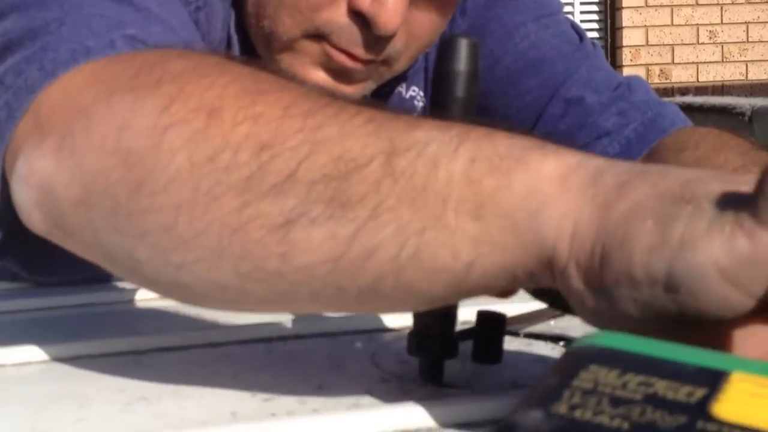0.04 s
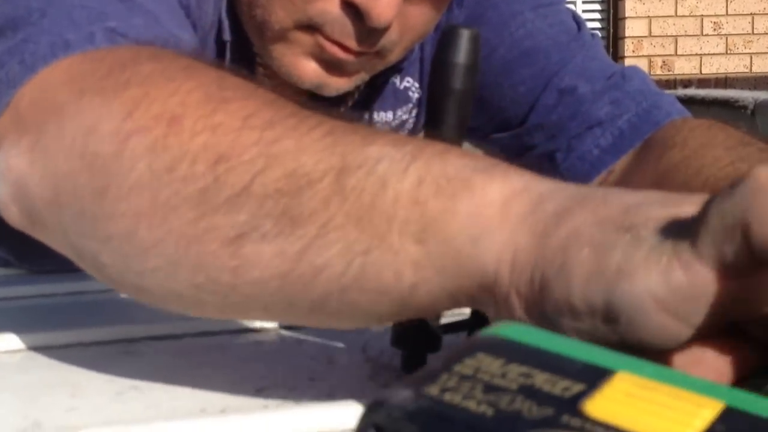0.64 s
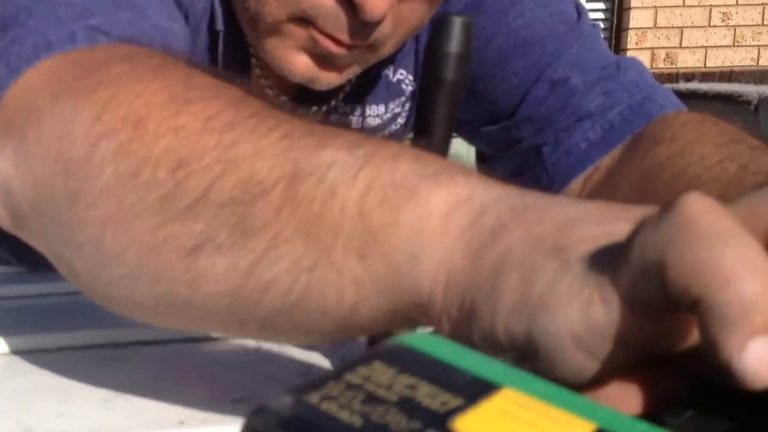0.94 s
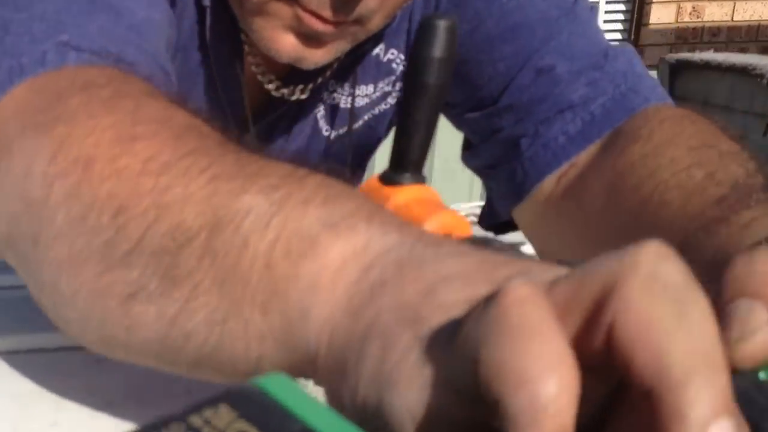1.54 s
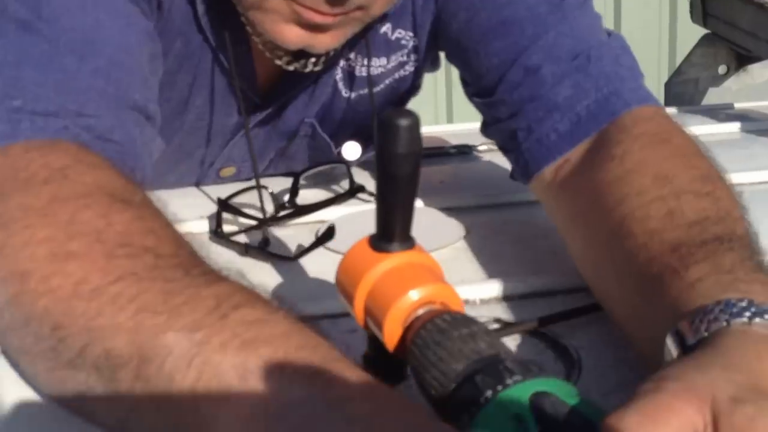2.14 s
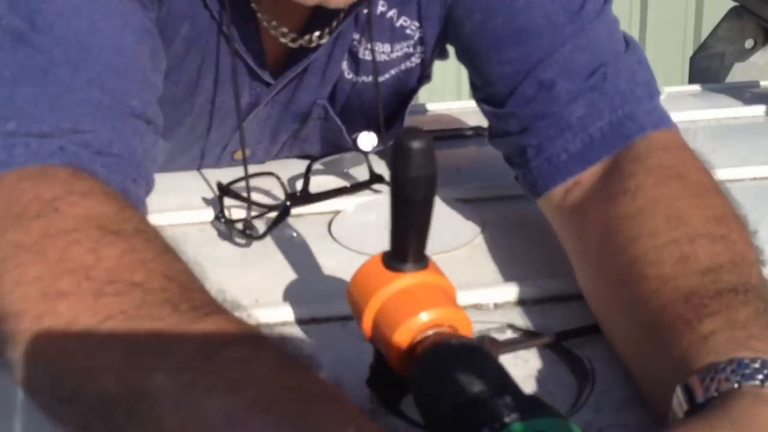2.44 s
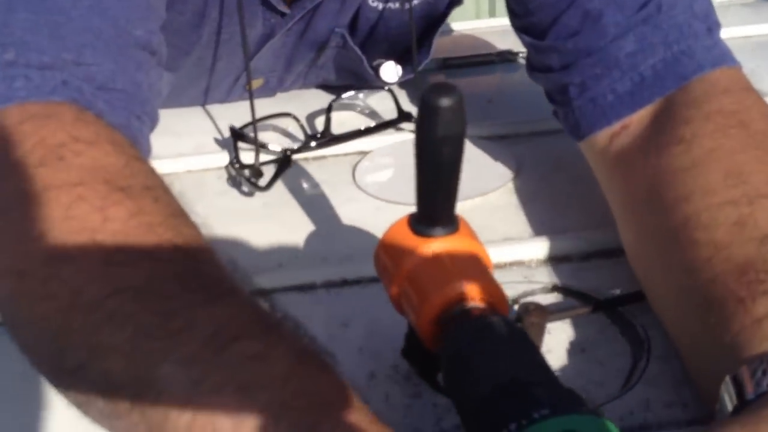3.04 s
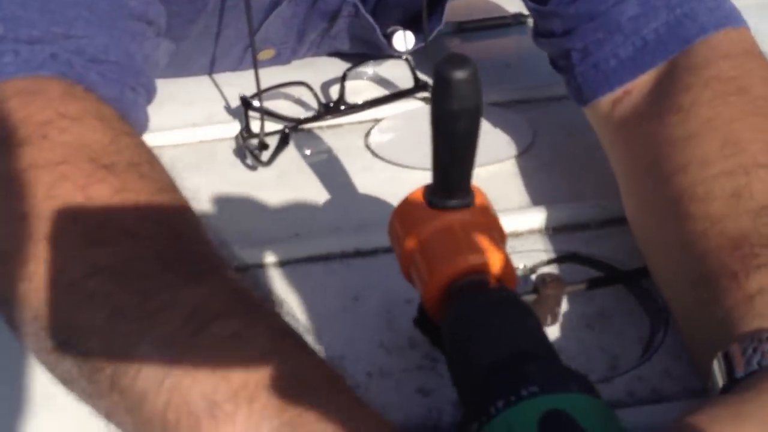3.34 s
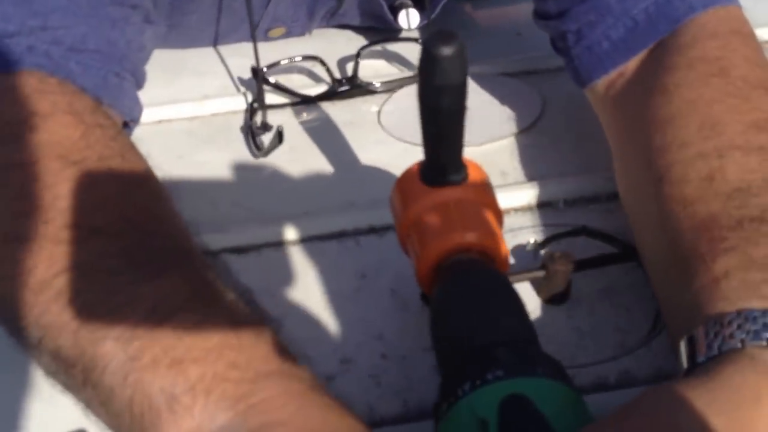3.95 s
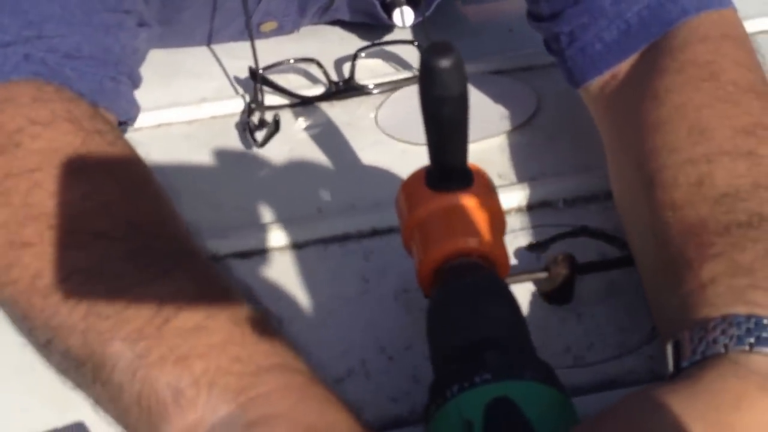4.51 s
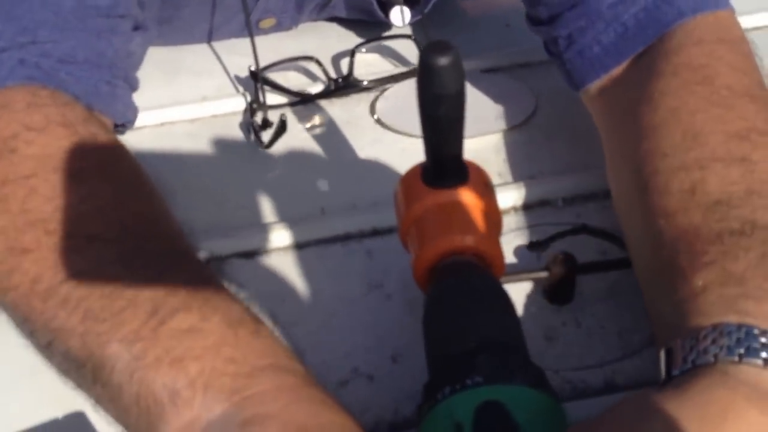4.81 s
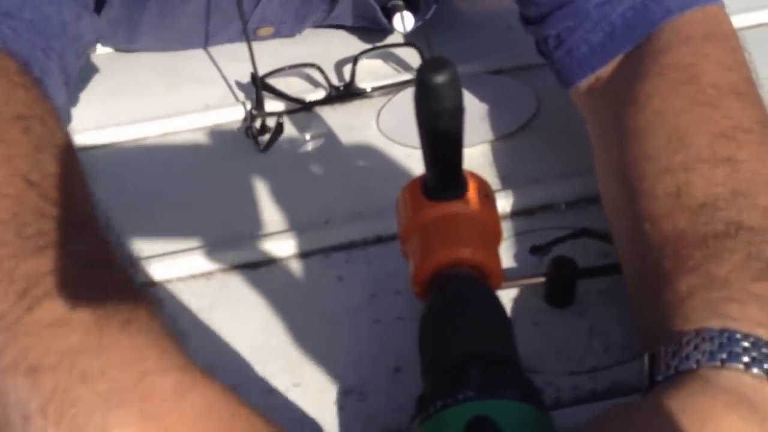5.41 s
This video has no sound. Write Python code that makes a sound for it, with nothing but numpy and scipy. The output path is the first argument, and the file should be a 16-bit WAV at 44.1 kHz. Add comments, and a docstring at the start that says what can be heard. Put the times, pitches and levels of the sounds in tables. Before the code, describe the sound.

A drill-driven nibbler cuts through a sheet-metal roof outdoors, heard close up. Its punch hammers very fast, each bite a sharp crack with a short metallic ring and a low panel thud, over a gritty, raspy gear whine. The drill slows briefly midway, picks up again, and runs down near the end. The motor then starts a quiet hum.

```python
"""A fast metallic hammering over a raspy whine: a drill-driven nibbler cuts a sheet-metal roof outdoors.
About 15 times a second the punch cracks through the sheet and rings it; at each bite the gear whine
peaks and sags in pitch. Crank speed and feed pressure drive both. An arm screens the tool at first.
The drill slows once midway, runs down near the end and starts to hum again."""
import sys
import numpy as np
from scipy import signal
from scipy.fft import rfft, irfft, next_fast_len
from scipy.io import wavfile
from scipy.ndimage import map_coordinates

SR = 44100
rng = np.random.default_rng(int(sys.argv[2]) if len(sys.argv) > 2 else 0)


def wrap_up_sound(samples):
    """Save the sound to the file named by the first command line argument, as 16-bit audio."""
    columns = np.atleast_2d(samples).T
    # keep every value between -1 and 1, then stretch to whole-number steps
    tamed = np.clip(columns, -1, 1)
    steps = np.round(tamed * 32767).astype(np.int16)
    wavfile.write(sys.argv[1], SR, steps)


N = 245637
TIME = np.arange(N) / SR
TOP_HZ = 15450
RING_DB = -15  # base level of the sheet's modes and clatter

# Pressure pushing the tool into the cut. Each row: time in seconds, level in dB.
FEED_PRESSURE = [(0, -1.5), (.5, -0.5), (.65, -1.5), (.88, 1.7), (1.02, -0.5), (1.2, 2.5), (1.42, 0.5),
                 (1.52, -2.5), (1.66, 1.5), (2.02, -0.5), (2.2, 1.5), (2.35, -0.5), (3.05, 1.6), (3.57, -1),
                 (4.22, -0.2), (4.48, -0.6), (4.8, 1.26), (5.26, 1)]
# Spectrum of shearing metal. Each row: frequency in Hz, level in dB.
CRACK_SPECTRUM = [(60, -32), (250, -9.5), (1000, -2), (2500, 4), (3500, 1), (5500, 1), (8000, 3.5),
                  (10300, -2), (12500, 2.5), (15000, -0.5)]


def amp(db):
    """Decibels to gain."""
    return 10 ** (np.asarray(db) / 20)


def unit(x):
    """Scale to rms 1."""
    return x / np.sqrt(np.mean(x ** 2) + 1e-20)


def curves(rows, at=TIME):
    """Interpolate each later column linearly over the first."""
    knots, *columns = np.transpose(rows)
    return [np.interp(at, knots, column) for column in columns]


def wobble(knots_per_s):
    """Smooth random curve."""
    return map_coordinates(rng.standard_normal(int(N * knots_per_s / SR) + 4), [TIME * knots_per_s])


def coloured(x, spectrum, modes=()):
    """Minimum-phase filter of unit power: a broad spectrum lifted by resonances."""
    size = 2 ** 13
    hz = np.fft.rfftfreq(size, 1 / SR)
    knots_hz, knots_db = np.transpose(spectrum)
    lift_db = sum(db / (1 + (2 * (hz - mode_hz) / width_hz) ** 2) for mode_hz, width_hz, db in modes)
    gain = amp(np.interp(np.log(hz + 1), np.log(knots_hz), knots_db) + lift_db)
    gain /= np.sqrt(np.mean(gain[hz < TOP_HZ] ** 2) * TOP_HZ * 2 / SR)
    cepstrum = irfft(np.log(gain))
    cepstrum[1:size // 2] *= 2
    cepstrum[size // 2 + 1:] = 0
    return signal.fftconvolve(x, irfft(np.exp(rfft(cepstrum))))[:N]


def burst(delay_s, attack_s, t60_s):
    """Envelope: quick rise, exponential fall."""
    t = np.maximum(np.arange(SR // 4) / SR - delay_s, 0)
    return (1 - np.exp(-t / attack_s)) * amp(-60 * t / t60_s)


def blows(times_s, levels_db, envelope, alike, pattern_count=8):
    """Dense ringing per punch; the share `alike` recurs, its colour slowly changing over time."""
    ring_patterns = rng.standard_normal((pattern_count, len(envelope)))
    out = np.zeros(N + SR)
    for start_s, db in zip(times_s, levels_db):
        centre = start_s * SR / N * (pattern_count - 1)
        weights = np.exp(-(np.arange(pattern_count) - centre) ** 2)
        recurring = weights @ ring_patterns / np.linalg.norm(weights)
        ring = np.sqrt(alike) * recurring + np.sqrt(1 - alike) * rng.standard_normal(len(envelope))
        out[round(start_s * SR):][:len(envelope)] += amp(db) * envelope * ring
    return out[:N]


def screened(at=TIME, half_clear_s=1.76, move_s=1):
    """1 while the arm hides the tool, 0 once it is in the open."""
    return np.clip(.5 - (at - half_clear_s) / move_s, 0, 1)


def crank(first_punch_s=0.0094, nominal_turns_per_s=15):
    """Turns since the first punch, and speed in decades relative to nominal."""
    # Crank speed. Each row: time in seconds, turns per second.
    crank_speed = [(0.0, 14.745), (0.842, 14.871), (0.963, 14.328), (1.167, 14.925), (1.458, 14.993),
                   (1.637, 14.615), (1.863, 14.924), (2.568, 15.037), (2.652, 9.003), (2.806, 8.225),
                   (2.881, 14.291), (3.069, 15.239), (3.803, 15.202), (4.429, 15.619), (4.793, 15.326),
                   (5.113, 15.689), (5.172, 11.365), (5.45, 1.0)]
    turns_per_s, = curves(crank_speed)
    turns = np.cumsum(turns_per_s) / SR
    return turns - np.interp(first_punch_s, TIME, turns), np.log10(turns_per_s / nominal_turns_per_s)


def strokes(db_per_decade=5, scatter_db=0.92):
    """Time and force of the punches: one per turn, harder with more feed and speed."""
    turns, decades = crank()
    times_s = np.interp(np.arange(np.ceil(turns[-1])), turns, TIME)
    feed_db, = curves(FEED_PRESSURE, times_s)
    speed_db = db_per_decade * np.interp(times_s, TIME, decades)
    return times_s, feed_db + speed_db + scatter_db * rng.standard_normal(len(times_s))


def air(level_db=-72):
    """Faint, dull outdoor noise."""
    return amp(level_db) * coloured(rng.standard_normal(N), [(130, 4), (12000, -48)])


def motor_restart(start_s=5.455, rise_s=0.024, base_db=-40, inrush_db=8.5, inrush_s=0.038,
                  mains_hz=50, drone_hz=183):
    """The slow motor surges and drones; its brushes rasp with each half cycle of the mains."""
    # Brush noise spectrum. Each row: frequency in Hz, level in dB.
    brush_spectrum = [(30, -31), (150, 7.5), (500, -12), (3500, -6.5), (7000, -19.5), (15000, -22)]
    # Drill resonances. Each row: centre in Hz, width in Hz, lift in dB.
    drill_modes = [(295, 160, 14.5), (1124, 250, 12), (2700, 560, 11), (5100, 450, 11), (8380, 300, 21)]
    age_s = np.maximum(TIME - start_s, 0)
    envelope = np.minimum(age_s / rise_s, 1) * amp(base_db + inrush_db * np.exp(-age_s / inrush_s))
    torque = 1 + 0.28 * np.cos(2 * np.pi * 2 * mains_hz * TIME)
    drone = amp(-1) * np.sin(2 * np.pi * np.cumsum(drone_hz * (1 + 0.075 * wobble(60))) / SR)
    brushes = unit(coloured(torque * rng.standard_normal(N), brush_spectrum, drill_modes))
    return envelope * (drone + brushes)


def die_scrape():
    """The die catches and slides on the sheet along the first stretch of the cut."""
    # Scrape envelope. Each row: time in seconds, level in dB.
    scrape_levels = [(.9, -29), (1.2, -25), (1.45, -24.5), (2.1, -73)]
    # Friction spectrum. Each row: frequency in Hz, level in dB.
    scrape_spectrum = [(100, -19), (400, -18), (2200, -1), (3600, -17), (5000, -15.5), (6300, -13),
                       (7800, -17), (10000, -43)]
    level_db, = curves(scrape_levels)
    slips = unit(rng.standard_normal(N) * amp(3.7 * wobble(250) + 0.75 * wobble(27.74)))
    return amp(level_db) * coloured(slips, scrape_spectrum)


def gear_noise(base_db=-23, db_per_decade=25.5, arm_db=-2.4, repeat_share=0.46, points_per_turn=2900):
    """Gritty churn that grows with speed and feed, plus a bright crunch as the punch starts to shear."""
    # Noise through one stroke. Each row: turn since the punch (0-1), churn in dB, crunch in dB.
    stroke_levels = [(0, 1, -10), (.3, -1.2, -40), (.7, -2.5, -17), (.9, -0.5, -11), (1, 4, -5)]
    # Gear noise spectrum. Each row: frequency in Hz, level in dB.
    gear_spectrum = [(25, -29), (55, -24.5), (110, -5.5), (160, 5), (205, 4), (275, 2), (460, -4.5),
                     (600, -2), (2600, -10.5), (3600, -10), (5000, -12), (8200, -18.5), (10000, -25),
                     (15000, -32)]
    turns, decades = crank()
    turn = turns % 1
    feed_db, = curves(FEED_PRESSURE)
    level_db = base_db + db_per_decade * decades + feed_db + arm_db * screened()
    churn_db, crunch_db = curves(stroke_levels, turn)
    gear_grit, shear_grit = unit(rng.standard_normal((2, N)) * amp(2.6 * wobble(600)))
    # the same teeth meet on every turn, so part of the noise repeats
    flanks = irfft(np.exp(2j * np.pi * rng.random(points_per_turn // 2 + 1)))
    teeth = unit(map_coordinates(flanks, [turn * points_per_turn], mode="grid-wrap"))
    churn = np.sqrt(repeat_share) * teeth + np.sqrt(1 - repeat_share) * gear_grit
    crunch = coloured(shear_grit * amp(level_db + crunch_db), CRACK_SPECTRUM)
    return coloured(churn * amp(level_db + churn_db - 2), gear_spectrum) + crunch


def gear_whine(mesh_hz=2870, base_db=-30.5, db_per_decade=70, arm_db=-3.5, flutter=0.01395, rasp=0.38):
    """The mesh tone follows speed, swells and sags at each bite; backlash frays it into a rasp."""
    # Gear load through one stroke. Each row: turn since the punch (0-1), pitch ratio, level in dB.
    gear_load = [(0, .96, -15), (.06, .93, 1), (.3, .98, 1.5), (.5, 1.0, 4.5), (.72, 1.005, -7.5),
                 (.88, 1.04, 3), (.96, 1.015, 13.5), (1, .96, 14)]
    turns, decades = crank()
    feed_db, = curves(FEED_PRESSURE)
    level_db = base_db + db_per_decade * decades + feed_db + arm_db * screened()
    sag, load_db = curves(gear_load, turns % 1)
    pitch_hz = mesh_hz * 10 ** decades * sag * (1 + flutter * wobble(500))
    phase = 2 * np.pi * np.cumsum(pitch_hz) / SR
    tone = np.sin(phase) + rasp * wobble(700) * np.cos(phase)
    roughness_db = 2.6 * wobble(250) + 1.5 * wobble(25.02)
    return tone * amp(level_db + load_db + roughness_db)


def panel_thuds(times_s, forces_db, base_db=2, scatter_db=2, jitter_s=0.00031):
    """Each stroke shoves the panel, which slaps back against the die and flexes with a low thud."""
    # Pushes in one stroke. Each row: delay after the punch in seconds, level in dB.
    pushes = [(.0008, -2.5), (0.0134, -5), (0.0233, -4.5), (0.0435, -8.5)]
    # Flexing panel's response. Each row: frequency in Hz, level in dB.
    flex_spectrum = [(30, -41), (70, -26), (110, -10.5), (160, 1.5), (210, -4.5), (272, 2), (430, -14),
                     (1000, -35.5), (4000, -57)]
    delay_s, push_db = np.transpose(pushes)
    chance = rng.standard_normal((len(times_s), 2, len(delay_s)))
    onsets = np.round((times_s[:, None] + delay_s + jitter_s * chance[:, 0]) * SR).astype(int)
    gains = amp(base_db + forces_db[:, None] + push_db + scatter_db * chance[:, 1])
    impulses = np.bincount(np.clip(onsets.ravel(), 0, N), gains.ravel(), N)
    return coloured(impulses, flex_spectrum)


def sheet_ring(times_s, forces_db, scatter_db=2, detune=0.0091, attack_s=0.0012):
    """Each punch rings the modes; their balance shifts as the arm moves away."""
    # Sheet and tool modes. Each row: frequency in Hz, t60 in seconds, screened dB, open dB.
    sheet_modes = [(275.7, 0.1, -10, -10.5), (341.2, 0.087, -18, -7), (564, 0.13, -7, -9),
                   (637, 0.062, -3, -4.5), (905, 0.039, 1, -7), (1162, 0.081, -10, -1.5),
                   (1247, 0.056, -7.5, -2), (1608, 0.043, 0.5, -6), (2500, 0.031, 3, -36),
                   (2650, 0.04, -0.5, -25)]
    hz, t60_s, screened_db, open_db = np.transpose(sheet_modes)[:, :, None]
    t = np.arange(SR // 8) / SR
    attack = 1 - np.exp(-t / attack_s)
    out = np.zeros(N + SR)
    for start_s, force_db in zip(times_s, forces_db):
        level_draw, pitch_draw, phase = rng.standard_normal((3, len(hz), 1))
        mode_db = open_db + screened(start_s) * (screened_db - open_db)
        level_db = RING_DB + force_db + mode_db + scatter_db * level_draw
        waves = np.sin(2 * np.pi * hz * (1 + detune * pitch_draw) * t + phase)
        ring = np.sum(waves * amp(level_db - 60 * t / t60_s), axis=0)
        out[round(start_s * SR):][:len(t)] += attack * ring
    return out[:N]


def punches(times_s, forces_db, base_db=-6, rattle_scatter_db=4.5):
    """The slug snaps out with a crack, the punch rattles through the die, and the sheet clatters."""
    # Clattering sheet's spectrum. Each row: frequency in Hz, level in dB.
    sheet_spectrum = [(40, -20), (120, -14), (260, 1.5), (460, -3), (750, -1.5), (1400, -6.5), (2500, -8),
                      (3600, -8.5), (7500, -14.5), (10000, -24.5), (15000, -24)]
    arm = screened(times_s)
    snap_db = base_db + forces_db - 2.5 * arm
    rattle_db = snap_db - 10 - 14 * arm + rattle_scatter_db * rng.standard_normal(len(times_s))
    clatter_db = RING_DB + forces_db + arm  # 1 dB more on the first stretch of the cut
    snap = burst(0, attack_s=0.00097, t60_s=0.025)
    snap += amp(-19) * burst(0.0022, attack_s=0.0032, t60_s=0.17)
    rattle = burst(0.0088, attack_s=0.014, t60_s=0.039)
    clatter = burst(0, attack_s=0.00053, t60_s=0.058)
    clatter += amp(-7.5) * burst(0.0053, attack_s=0.0088, t60_s=0.23)
    crack = blows(times_s, snap_db, snap, alike=0.88) + blows(times_s, rattle_db, rattle, alike=0.22)
    sheet = blows(times_s, clatter_db, clatter, alike=0.63)
    return coloured(crack, CRACK_SPECTRUM) + coloured(sheet, sheet_spectrum)


def scene():
    """The nibbler on the roof over faint outdoor air, mono."""
    times_s, forces_db = strokes()
    hits = punches(times_s, forces_db) + sheet_ring(times_s, forces_db) + panel_thuds(times_s, forces_db)
    return (hits + die_scrape() + air() + gear_noise() + gear_whine() + motor_restart())[None]


def record(dry):
    """Round off the highest peaks, then cut everything above TOP_HZ."""
    limited = dry / (1 + np.abs(dry / .9) ** 5) ** (1 / 5)
    size = next_fast_len(N + SR // 2)
    passband = np.fft.rfftfreq(size, 1 / SR) < TOP_HZ
    return irfft(rfft(limited, size) * passband, size)[:, :N]


dry = scene()
out = record(dry)
wrap_up_sound(out)
```